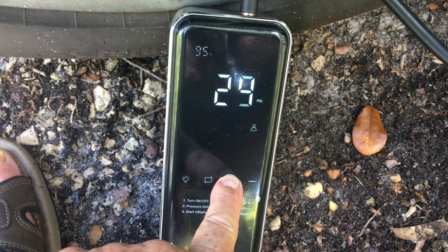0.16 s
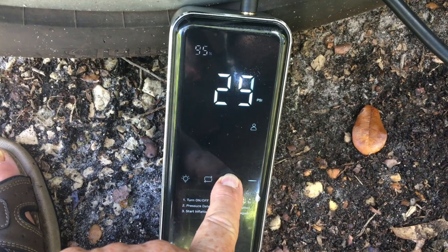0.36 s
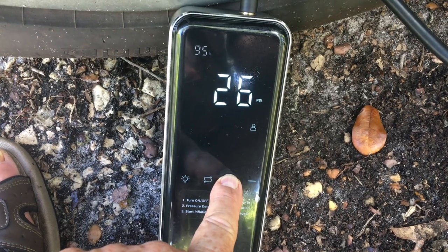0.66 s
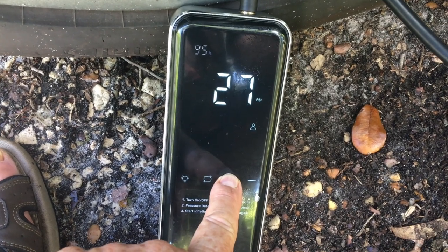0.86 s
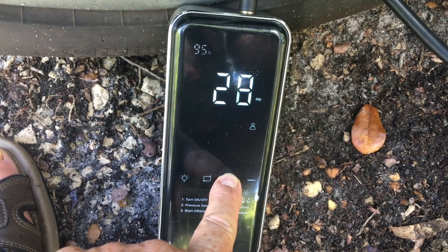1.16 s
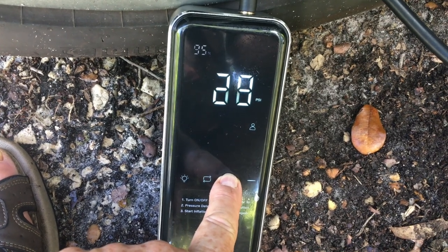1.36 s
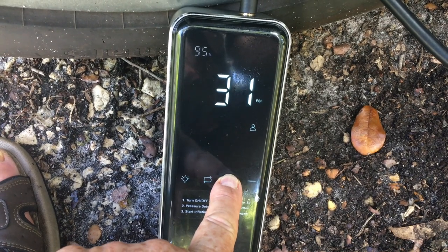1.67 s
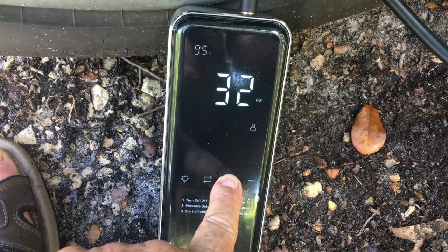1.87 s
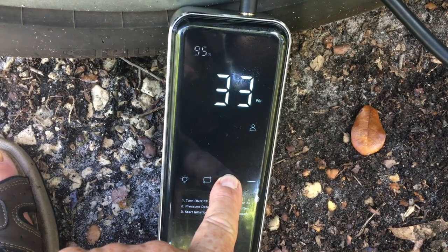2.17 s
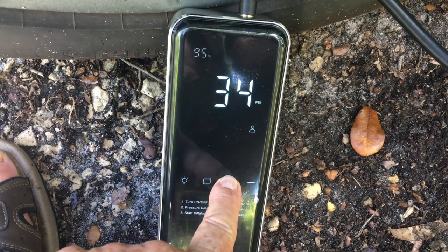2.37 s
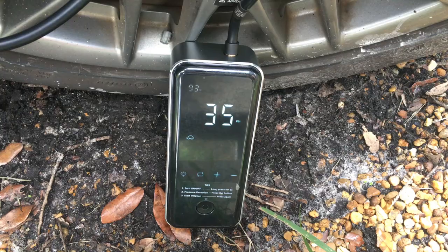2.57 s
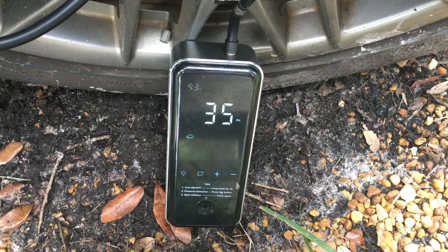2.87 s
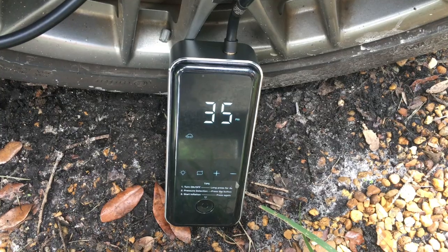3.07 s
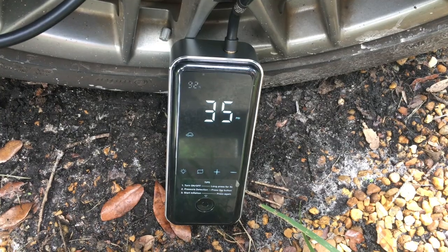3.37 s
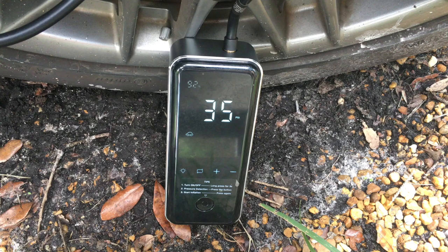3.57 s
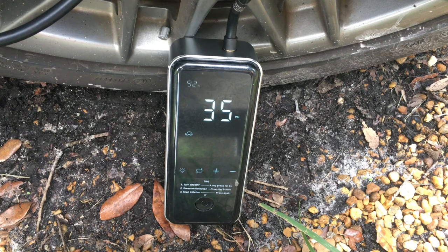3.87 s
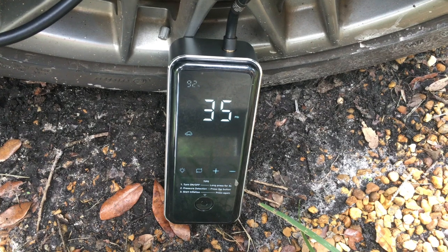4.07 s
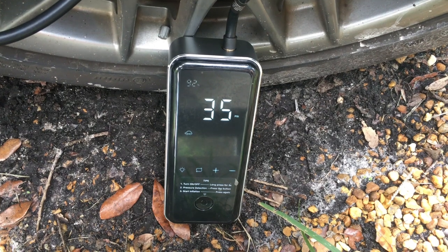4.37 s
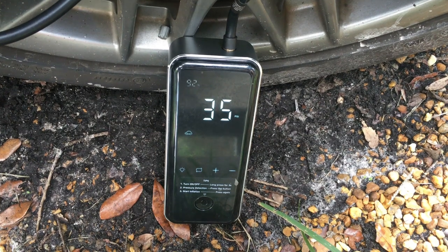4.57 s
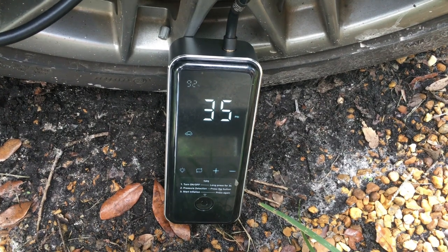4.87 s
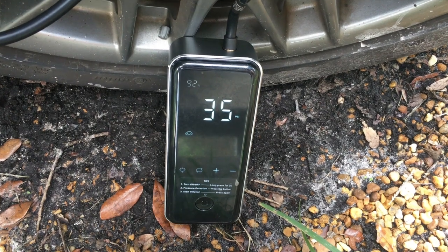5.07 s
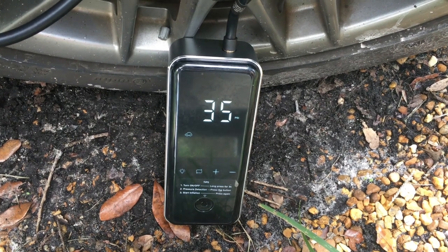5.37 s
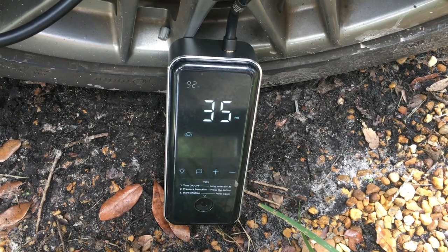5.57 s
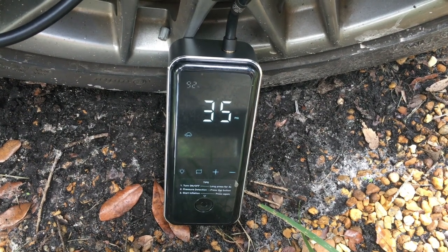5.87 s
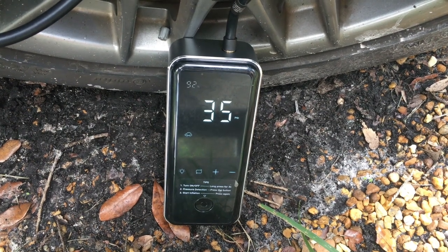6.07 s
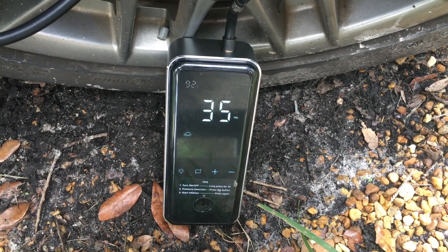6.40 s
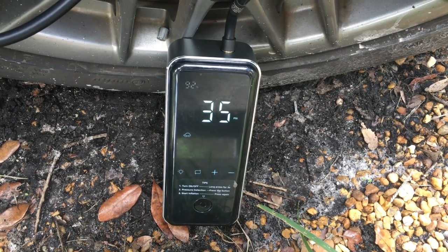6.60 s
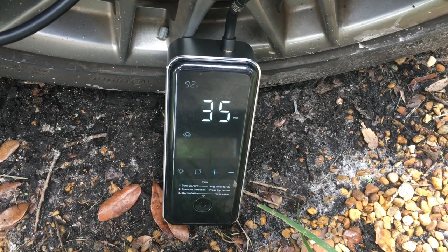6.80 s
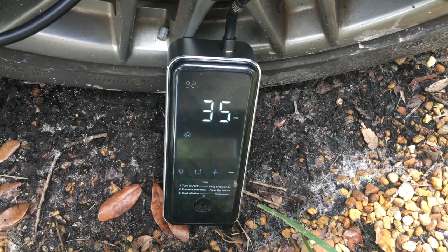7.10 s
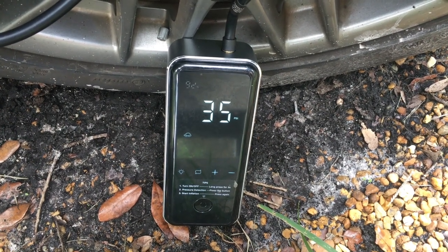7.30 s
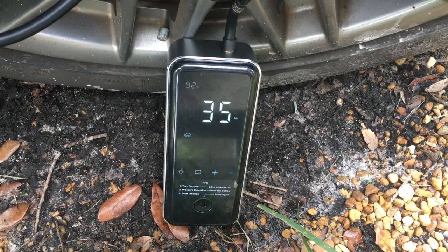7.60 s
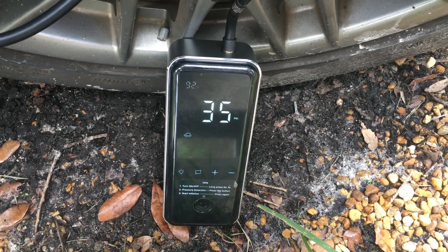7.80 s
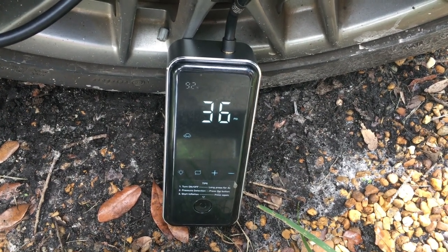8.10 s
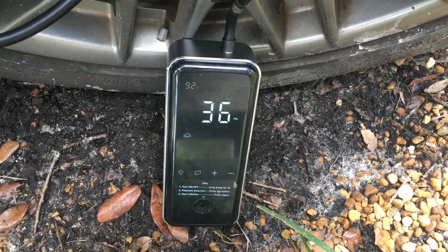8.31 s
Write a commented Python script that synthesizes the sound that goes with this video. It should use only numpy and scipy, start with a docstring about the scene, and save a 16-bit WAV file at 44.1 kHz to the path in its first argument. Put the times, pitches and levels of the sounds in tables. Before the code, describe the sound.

Quiet outdoor air with a low distant engine drone, soft traffic wash and two very faint hoarse bird calls. A small button clicks, and a cordless tire inflator close to the microphone starts abruptly. Its rapid piston makes a loud, steady, rattling buzz with metallic ringing, valve squeal and hissing air, until it cuts off in a few quick bumps.

```python
"""Piston inflator on a car tire

Outdoors, a cordless inflator stands close to the microphone; behind it lie an engine drone and traffic wash.
A far bird calls twice (runs of noise notes), a whine (a wavering sine) swells and the start button clicks.
The pump then runs at about 52 strokes a second: impulses at set crank angles thump, knock the case and
ring the metal, a swept sine squeals in the valve and sputtering noise hisses through the ports.
At switch-off the crank brakes to a standstill; bumps ring with the last strokes and as the piston rebounds."""
import sys
import numpy as np
from scipy import signal
from scipy.fft import rfft, irfft, next_fast_len
from scipy.io import wavfile
from scipy.ndimage import map_coordinates

SR = 44100
rng = np.random.default_rng(int(sys.argv[2]) if len(sys.argv) > 2 else 0)


def wav_out(sig):
    """Save sig, one row per channel (or a flat mono array), as 16-bit PCM at SR to the path in sys.argv[1]."""
    wavfile.write(sys.argv[1], SR, np.round(np.clip(np.atleast_2d(sig).T, -1, 1) * 32767).astype(np.int16))


N = 372644

ON_S, OFF_S = 2.567, 8.27  # motor switched on and off

# crank speed under power, before braking: (time [s], speed [strokes/s])
RUN_SPEED = [(2.57, 52.57), (3.2, 52.22), (7.8, 52.42), (8.27, 52.31)]
# response of the plastic case: (frequency [Hz], relative level [dB])
CASE_BODY = [(320, -32), (550, -33.5), (627, -7), (677, -12), (714, 0.5), (838, 0), (888, -0.5), (965, 1),
             (1190, 4), (1300, -3.5), (1460, 1), (1640, -14.5), (1750, -8), (2280, -52), (3850, -120)]
# resonances of cylinder and gear train: (frequency [Hz], width [Hz], relative level [dB])
METAL_MODES = [(2520, 147, -1), (3044, 162, -0.5), (3438, 50, -2), (3740, 45, -2), (4220, 220, -7),
               (4696, 260, -10), (5514, 180, -7), (5980, 39, -7.5), (6600, 260, -20), (8160, 110, -18.5),
               (8730, 210, -16.5)]


def amp(db):
    """Decibels to gain."""
    return 10 ** (np.asarray(db) / 20)


def unit(x):
    """Scale to rms 1."""
    return x / np.sqrt(np.mean(x ** 2) + 1e-20)


def seconds():
    """Time of every sample in seconds."""
    return np.arange(N) / SR


def noise():
    """Fresh white noise."""
    return rng.standard_normal(N)


def wobble(rate):
    """A smooth random curve with this many random knots a second."""
    knots = rng.standard_normal(8192)
    return map_coordinates(knots, [np.arange(N) * rate / SR], mode="wrap")


def ramp(start, length):
    """Rises from 0 at start to 1 after length seconds, then stays there."""
    return np.clip((seconds() - start) / length, 0, 1)


def bell(middle, half):
    """A Gaussian swell to 1 and back; half is its standard deviation in seconds."""
    return np.exp(-.5 * ((seconds() - middle) / half) ** 2)


def decay(s, t60):
    """Envelope of a blow at time s: a half-millisecond rise, then a fall of 60 dB in t60 seconds."""
    age = np.maximum(seconds() - s, 0)
    return (1 - np.exp(-age / .0005)) * amp(-60 * age / t60)


def slope(points):
    """Gain through (Hz, dB) points on a log frequency axis."""
    f, db = np.transpose(points)
    return lambda hz: amp(np.interp(np.log(hz + 1), np.log(f), db))


def peaks(modes):
    """Gain of a set of (Hz, width, dB) resonances, their powers added."""
    def gain(hz):
        power = 0
        for centre, width, db in modes:
            detuning = (centre * centre - hz * hz) ** 2
            power = power + (amp(db) * hz * width) ** 2 / (detuning + (hz * width) ** 2)
        return np.sqrt(power)
    return gain


def ring(x, gain, size=8192):
    """Pass x through a causal, minimum-phase body with this gain."""
    cepstrum = irfft(np.log(np.maximum(gain(np.fft.rfftfreq(size, 1 / SR)), 1e-6)))
    # folding the cepstrum forward in time makes the response start at once
    cepstrum[1:size // 2] *= 2
    cepstrum[size // 2 + 1:] = 0
    response = irfft(np.exp(rfft(cepstrum)))
    return signal.oaconvolve(x, response)[:N]


def band(hz, width):
    """Noise of rms 1 in one resonance, squared to steepen its flanks."""
    resonance = peaks([(hz, width, 0)])
    return unit(ring(noise(), lambda f: resonance(f) ** 2))


def lingering(x, life):
    """Each impulse dies away exponentially, to 1/e in life seconds."""
    return signal.lfilter([1], [1, -np.exp(-1 / (life * SR))], x)


def curves(rows):
    """One value per sample for each column after the time."""
    s, *cols = np.transpose(rows)
    return [np.interp(seconds(), s, c) for c in cols]


def per_turn(rows, turns):
    """Columns of a crank-angle table, repeated every turn."""
    angle, *cols = np.transpose(rows)
    return [np.interp(turns, angle, c, period=1) for c in cols]


def blows(turns, angle, scatter, spread_db):
    """One impulse a turn near this crank angle, uneven in time and size."""
    whole = np.arange(np.ceil(turns[0]), np.floor(turns[-1]))
    late, size = rng.standard_normal((len(whole), 2)).T
    at = np.searchsorted(turns, whole + angle + scatter * late)
    return np.bincount(at, amp(spread_db * size), N + 1)[:N]


def engine_drone(hz=68, level_db=-38.5):
    """A distant engine's tone wavers in phase and level, sinks in one lull and later dies away."""
    phase = 2 * np.pi * hz * seconds() + 0.67 * wobble(10.0)
    drone = unit(np.sin(phase) * amp(1.6 * wobble(15)))
    lull_db = 15 * bell(0.63, 0.077)
    fade_db = 60 * ramp(2.44, 0.45)
    return amp(level_db - lull_db - fade_db) * drone


def traffic_wash(level_db=-40, duck_db=10.5, duck_s=0.054):
    """Distant traffic is shaped noise that drifts in level; the recorder turns it down once the pump starts."""
    # outdoor wash: (frequency [Hz], relative level [dB])
    air = [(20, -28), (55, 2), (110, -2), (230, -4), (330, -8.5), (470, -17), (650, -13), (900, -18.5),
           (1200, -15), (1750, -26), (2100, -27), (4000, -40.5), (8000, -49.5), (15500, -60)]
    wash = unit(ring(noise(), slope(air)))
    drift_db = 0.6 * wobble(5)
    return amp(level_db + drift_db - duck_db * ramp(ON_S, duck_s)) * wash


def bird(note_s=0.019):
    """A far bird: each call is a quick run of hoarse, overlapping noise notes."""
    # the calls: (time [s], level [dB])
    calls = [(.87, -60), (1.65, -62)]
    # notes of one call: (time after its start [s], frequency [Hz], width [Hz], level in the call [dB])
    notes = [(0.032, 3900, 350, 2), (.06, 3400, 500, -3), (.085, 2730, 350, 2), (0.068, 5300, 800, -5)]
    out = np.zeros(N)
    for after, hz, width, note_db in notes:
        swell = sum(amp(db + note_db) * bell(s + after, note_s) for s, db in calls)
        out += swell * band(hz, width)
    return out


def whine(hz=770, level_db=-58):
    """A far machine's faint tone, wavering in phase, swells once."""
    tone = unit(np.sin(2 * np.pi * hz * seconds() + 0.76 * wobble(18)))
    return amp(level_db) * bell(1.34, 0.24) * tone


def button():
    """Finger and start button give short noise clicks, and a faint ring swells after the press."""
    # clicks: (time [s], level [dB], centre [Hz], width [Hz], t60 [s])
    presses = [(2.31, -52, 3500, 4000, .03), (2.344, -40.5, 5900, 1500, .022),
               (2.369, -50, 5470, 5000, 0.061), (2.372, -34, 1020, 700, 0.083),
               (2.394, -47, 4000, 3500, 0.061)]
    # tones of the ring: (frequency [Hz], width [Hz], level [dB])
    after_ring = [(2280, 160, -55), (3700, 400, -63)]
    clicks = sum(amp(db) * decay(s, t60) * band(hz, width) for s, db, hz, width, t60 in presses)
    tones = sum(amp(db) * band(hz, width) for hz, width, db in after_ring)
    return clicks + bell(2.45, .042) * tones


def pace(stall_s=.135, stall_power=1.6):
    """Share of the running speed: 1 under power; without it the crank brakes ever harder to 0."""
    return 1 - ramp(OFF_S, stall_s) ** stall_power


def crank(start_turns=.195):
    """Crank angle in turns is the summed speed, with a slight flutter."""
    speed = curves(RUN_SPEED)[0] * pace()
    turns = np.cumsum(speed) / SR
    flutter = .003 * wobble(25)
    return turns - turns[round(ON_S * SR)] + start_turns + flutter


def effort(attack_s=0.02, slow_loss_db=13, coast_s=0.098, release_t60_s=.036):
    """Gain of the pump: a quick attack, a steady hold, weaker strokes as it slows, then a release."""
    released_s = np.maximum(seconds() - OFF_S - coast_s, 0)
    loss_db = slow_loss_db * (1 - pace()) + 60 * released_s / release_t60_s
    return ramp(ON_S, attack_s) * amp(-loss_db)


def thump(turns):
    """Each compression pushes one low pulse of air."""
    # spectrum of the pulse: (multiple of the stroke rate, relative level [dB])
    pulse = [(1, -3.5), (2, 1), (3, -14), (4, -3.5), (5, -5.5), (6, -8.5), (7, 0.5), (8, -2.5), (9, -1.5),
             (10, -9), (11, -8), (12, -1.5), (13, -24)]
    stroke_hz = np.median(np.transpose(RUN_SPEED)[1])
    body = [(32, -40)]
    body += [(k * stroke_hz, db) for k, db in pulse]
    body += [(900, -41.5), (2000, -54), (6000, -74)]
    strokes = blows(turns, angle=0.6094, scatter=0.00084, spread_db=0.17)
    return amp(-32.5) * unit(ring(strokes, slope(body)))


def chatter(hits, life):
    """Each impact sets off a short burst of noise."""
    return unit(lingering(hits, life) * noise())


def clatter(turns):
    """Rod, gear and valves knock the case and, with a short chatter, ring the metal parts."""
    # contacts in a turn: (crank angle [turns], relative knock [dB], relative click [dB], scatter [turns])
    contacts = [(0.096, -9, -5.5, 0.011), (0.297, -14.5, -3, 0.014), (0.573, -8, 1, 0.012),
                (0.655, -0.5, -0.5, 0.0013), (.761, -2.5, -10.5, 0.008), (0.96, -6.5, -9, 0.017)]
    knocks, clicks = np.zeros(N), np.zeros(N)
    for angle, knock_db, click_db, scatter in contacts:
        hits = blows(turns, angle, scatter, spread_db=0.4)
        knocks += amp(knock_db) * hits
        clicks += amp(click_db) * hits
    case = unit(ring(unit(knocks) + 0.54 * chatter(knocks, life=0.0063), slope(CASE_BODY)))
    metal = unit(ring(chatter(clicks, life=0.0036), peaks(METAL_MODES)))
    bright = slope([(2000, -10), (5500, -7), (15000, -17.0)])
    ticks = unit(ring(chatter(clicks, life=0.0019), bright))
    return amp(-26.0) * case + amp(-33.0) * metal + amp(-42.5) * ticks


def valve(turns):
    """The valve flutters in a gliding squeal with an octave, its phase starting afresh on every stroke."""
    # squeal through one turn: (crank angle [turns], pitch [Hz], relative level [dB], relative octave [dB])
    squeal = [(.1, 2164, -13.5, -29), (.24, 2172, 3, 11.5), (.31, 2320, -5, -26), (.4, 2195, 7, 9),
              (.5, 2028, 6, 7), (.6, 1930, -12, -2), (.75, 1982, -13.5, 1), (.95, 1979, -11, -25)]
    # valve chamber, which passes squeal and octave: (frequency [Hz], relative level [dB])
    chamber = [(1500, -33.5), (1800, 10), (1930, 12), (2080, 4.5), (2140, 2), (2260, 10), (2360, -20),
               (2700, -4), (3950, -5.5), (4090, 3), (4280, 10.5), (4450, -18.5), (5000, -24.5)]
    hz, db, octave_db = per_turn(squeal, turns)
    cycles = np.cumsum(hz * (1 + 0.012 * wobble(300))) / SR
    # count the cycles from 0.31 turns in each stroke
    stroke = np.floor(turns - .31)
    cycles -= cycles[np.searchsorted(stroke, stroke)]
    phase = 2 * np.pi * cycles + 0.59 * wobble(90)
    unsteady_db = 1.2 * wobble(200)
    tone = unit(amp(db + unsteady_db) * np.sin(phase))
    octave = unit(amp(octave_db) * np.sin(2 * phase))
    return amp(-27) * unit(ring(tone + amp(-6.0) * octave, slope(chamber)))


def hiss(turns, spurts_per_s=450, spurt_life=0.0032, steady=1.0):
    """Air sputters in random spurts through the ports, swelling and sinking with the crank."""
    # air flow through one turn: (crank angle [turns], relative hiss [dB])
    flow = [(0, -8.5), (.17, -15), (.3, -3), (.48, 6), (.6, -5), (.7, -8), (.82, 2)]
    # narrow air passages: (frequency [Hz], width [Hz], relative level [dB])
    passages = [(9850, 130, -7.5), (11020, 94, -2.5), (11400, 130, 2), (11800, 140, -15), (12060, 82, 3),
                (13000, 200, -3), (14100, 400, -10.5), (15000, 250, -18)]
    # broad rush of air: (frequency [Hz], relative level [dB])
    broad = [(25, -12), (70, -12), (200, -6.5), (450, 15.5), (1300, 12), (1650, 12.5), (2600, 15),
             (4000, 3.5), (6200, 8), (8500, 2.5), (10500, -2), (13000, -23), (15700, -21)]
    flow_db, = per_turn(flow, turns)
    starts = rng.random(N) < spurts_per_s / SR
    sputter = np.sqrt(steady + lingering(starts, spurt_life))
    ports = ring(amp(flow_db) * sputter * noise(), peaks(passages))
    # the rush follows the flow less deeply
    rush = ring(amp(0.57 * flow_db) * sputter * noise(), slope(broad))
    return amp(-43.5) * unit(ports) + amp(-35) * unit(rush)


def end_bumps(width_hz=350):
    """Ringing bumps: first with the last slowing strokes, then as the piston rebounds at the stop."""
    # bumps, each with its own ring: (time [s], level [dB], t60 [s], ring [Hz])
    bumps = [(8.307, -20, 0.055, 1480), (8.335, -19, 0.054, 1200), (8.353, -23, 0.064, 1270),
             (8.393, -29.5, 0.077, 1170), (8.402, -27, 0.03, 1380), (8.416, -33, 0.063, 1950),
             (8.427, -32, 0.056, 600)]
    case = unit(ring(noise(), slope(CASE_BODY)))
    metal = unit(ring(noise(), peaks(METAL_MODES)))
    shared = amp(-0.5) * case + amp(-9) * metal + amp(-5.5) * band(1940, 400)
    return sum(amp(db) * decay(s, t60) * (band(hz, width_hz) + shared) for s, db, t60, hz in bumps)


def scene():
    """The pump over the background; the squeal fades fast as the crank slows."""
    background = engine_drone() + traffic_wash() + bird() + whine()
    turns = crank()
    squeal = pace() ** 7 * valve(turns)
    pump = effort() * (thump(turns) + clatter(turns) + squeal + hiss(turns))
    return (background + button() + pump + end_bumps())[None]


def record(dry, top_hz=15780):
    """Nothing is kept from the band limit upward."""
    size = next_fast_len(N + SR // 2)
    kept = np.fft.rfftfreq(size, 1 / SR) < top_hz
    return irfft(rfft(dry, size) * kept, size)[:, :N]


dry = scene()
out = record(dry)
wav_out(out)
```